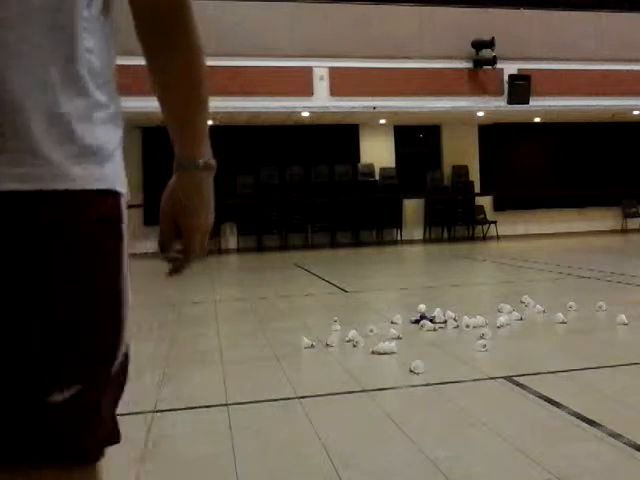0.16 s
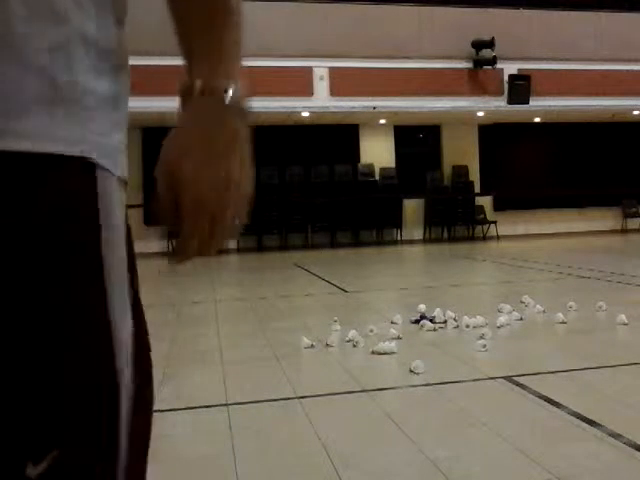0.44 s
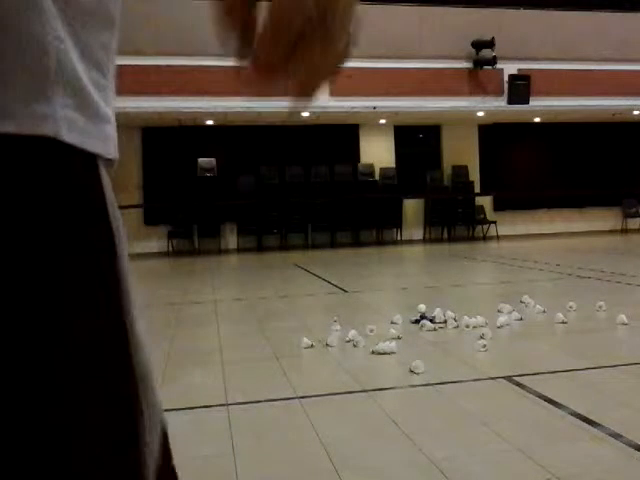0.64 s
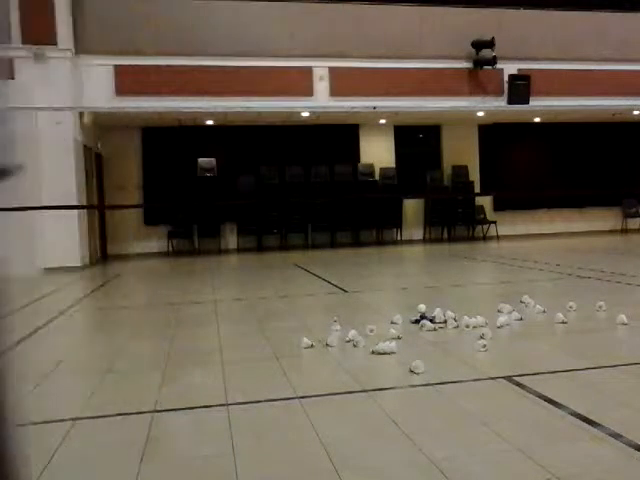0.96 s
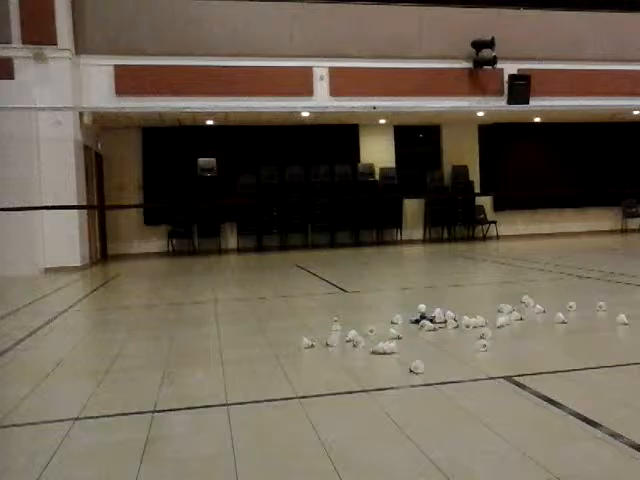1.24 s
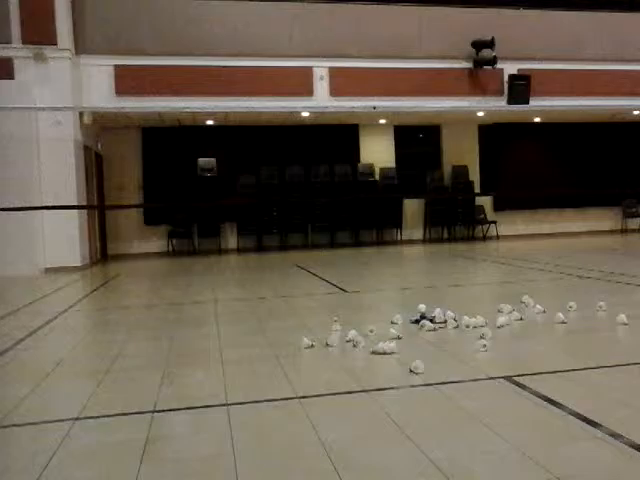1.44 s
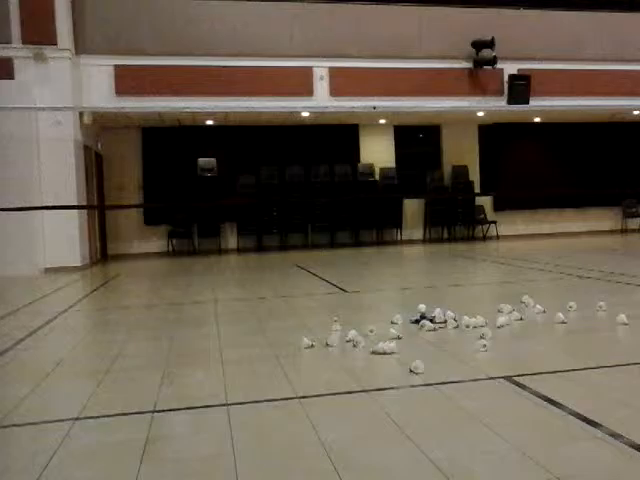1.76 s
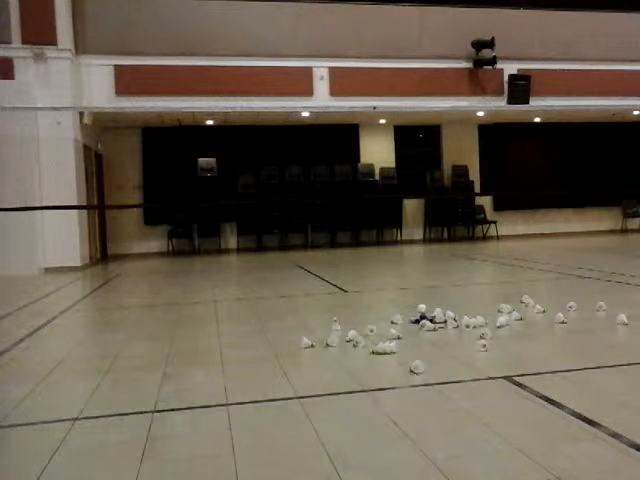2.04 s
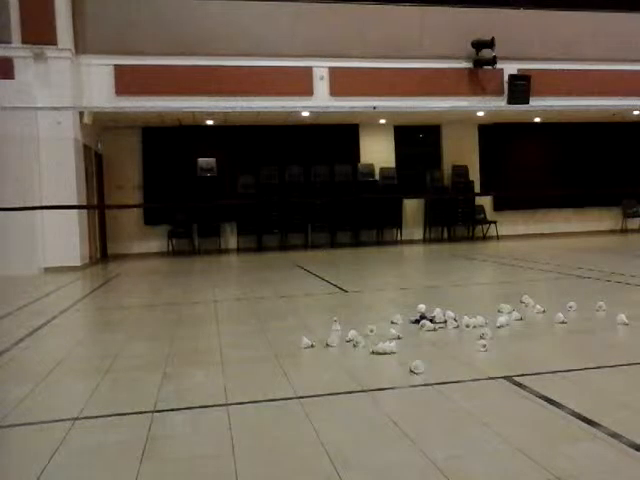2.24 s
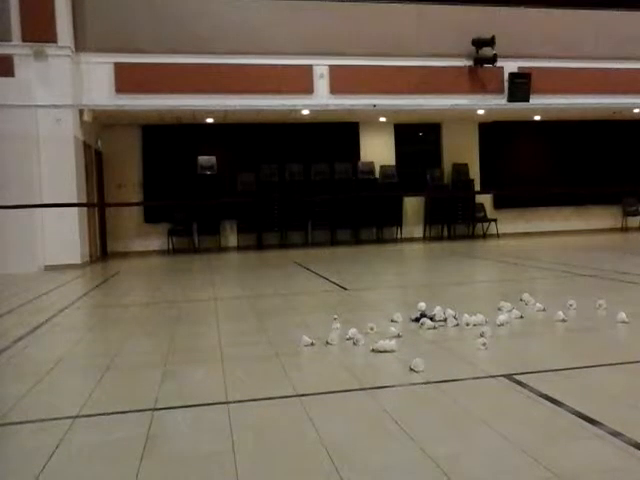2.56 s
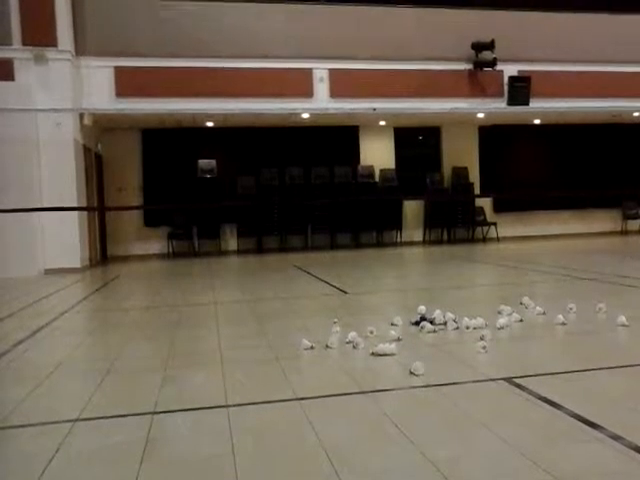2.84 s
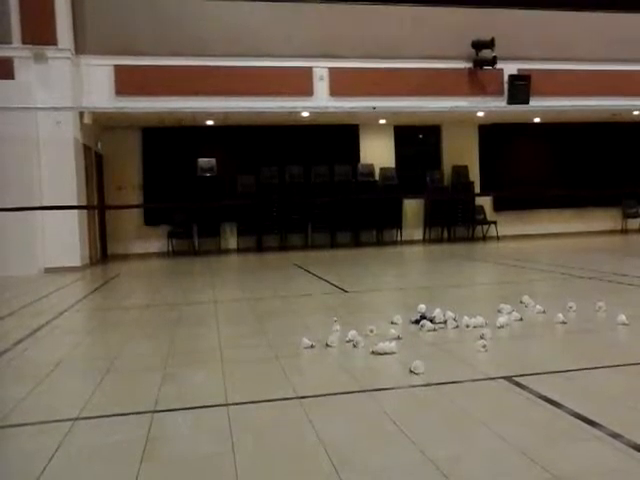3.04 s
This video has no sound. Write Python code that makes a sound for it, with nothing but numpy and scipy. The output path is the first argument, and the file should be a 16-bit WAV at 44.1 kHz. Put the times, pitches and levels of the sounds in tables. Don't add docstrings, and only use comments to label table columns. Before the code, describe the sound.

Rubber soles give short sharp squeaks on a smooth sports hall floor, first a lower one, then a piercing loud one, later smaller ones; knocks, ticks and scuffs between, faint ventilation, small bright microphone.

```python
import sys
import numpy as np
from scipy import signal
from scipy.fft import rfft, irfft, next_fast_len
from scipy.io import wavfile
from scipy.ndimage import uniform_filter1d, minimum_filter1d, map_coordinates

SR = 44100
rng = np.random.default_rng(int(sys.argv[2]) if len(sys.argv) > 2 else 0)


def linear_from_db(decibels):
    return 10 ** (np.asarray(decibels, float) / 20)


def master(y):
    cut = np.clip(np.atleast_2d(y).T, -1, 1)
    pcm = np.round(cut * 32767)
    wavfile.write(sys.argv[1], SR, pcm.astype(np.int16))


N = 141120
T = np.arange(N) / SR

# [t/s, slip rate f/Hz, level/dB, overtone boost/dB]
LOW_SQUEAK = [(1.258, 2620, -44, 13), (1.2605, 2662, -17.5, -2.5), (1.268, 2638, -27, 13),
              (1.276, 2811, -26.5, 4.5), (1.280, 2560, -24.5, 4.5), (1.290, 2613, -15.5, -13.5),
              (1.305, 2750, -15.5, -24), (1.315, 2600, -96, -9)]
HIGH_SQUEAK = [(1.275, 3436, -49, 0.0038), (1.289, 3494, -45.5, 0.0026), (1.321, 3557, -30, 0),
               (1.345, 3608, -33.5, 0), (1.360, 3800, -66, 0.022)]
LOUD_SQUEAK = [(1.5915, 4330, -45, -20), (1.5935, 4230, -16, -22), (1.5955, 4090, -10, -15),
               (1.599, 3940, -8.5, -7), (1.606, 3800, -11, -5), (1.612, 3660, -18, 4),
               (1.618, 3530, -19.5, 9), (1.622, 3110, -27, 10), (1.627, 2750, -55, 8)]
SHORT_SQUEAK = [(2.155, 3170, -58, 0), (2.159, 3050, -37, 3), (2.161, 3150, -23, -5), (2.165, 3100, -22, 3),
                (2.168, 2860, -31, 9), (2.172, 2600, -52, 3)]
LAST_SQUEAK = [(2.958, 2309, -50, 8), (2.961, 2298, -29, 8.5), (2.965, 2173, -17.5, 7),
               (2.975, 2211, -20.5, -3), (2.98, 2092, -25.5, 14), (2.986, 2251, -25, -7.5),
               (2.995, 2223, -23.5, 4), (3.006, 2196, -16, -10), (3.021, 2188, -27, -7)]
FAINT_SQUEAK = [(2.184, 3196, -60, 0), (2.193, 3167, -39.5, 4.5), (2.222, 3150, -59.5, 7),
                (2.234, 3130, -55.5, 3), (2.279, 3186, -43, -2), (2.33, 3160, -67, -5)]
GRIP_BEFORE_LOUD = [(1.5858, 3950, -55, 18), (1.5868, 3900, -28, 18), (1.5885, 3870, -15, 7),
                    (1.5903, 3850, -12.5, 0), (1.5918, 3830, -24, 0), (1.593, 3820, -55, 0)]
GRIP_BEFORE_LAST = [(2.9508, 2600, -45, 0), (2.9518, 2560, -15, 0), (2.955, 2430, -15.5, 0),
                    (2.9575, 2390, -18, 0), (2.960, 2330, -42, 0)]
SQUEAKS = [LOW_SQUEAK, HIGH_SQUEAK, LOUD_SQUEAK, SHORT_SQUEAK,
           LAST_SQUEAK, FAINT_SQUEAK, GRIP_BEFORE_LOUD, GRIP_BEFORE_LAST]
# [level/dB, ..]
OVERTONES = [
    [-14, -7, -17, -27.5, -31.5],
    [-7, -3.5, -33],
    [0, -3.5, -26],
    [2.5, -5, -23, -52],
    [4, -1.5, -3.5, -11, -25, -33],
    [-7.5, 0, -26],
    [0, -2, -23.5],
    [-7, -3, -10, -31, -20],
]
# [delay t/s, level/dB]
WALL_ECHOES = [
    [(.021, -3), (.043, -1)],
    [(.02, 1), (.04, -5.5)],
    [(.0165, -17), (.033, -13), (.040, -11)],
    [(.017, -14), (.032, -12), (.049, -13)],
    [(.011, -15), (.025, -4), (.040, -14)],
    [(.017, -3.5), (.032, -16)],
    [(.0165, -18), (.033, -14), (.040, -14)],
    [(.011, -12), (.025, -5), (.040, -12)],
]
SQUEAK_HALL = [-0.5, -0.5, -13.5, -20.5, -2, -1, -6.5, -2.5]
PITCH_WANDER = [.011, .014, .003, .009, .018, .03, .003, .014]
OVERTONE_FLUTTER = [2.5, 3, .7, 1, 4, 6, .5, 1.5]
OVERTONE_BLUR = [.25, .5, 1.1, .6, .15, .5, .3, .15]
GRIT_LEVEL = [-24.5, -19.5, -40, -17, -20, 0, -19, -20.5]
# [f/Hz, level/dB per Hz]
GRIT_COLOUR = [(1500, -43), (2800, 4), (4200, 6), (6500, 10), (9000, -23), (14000, -21)]
# [t/s, peak level/dB, pitch f/Hz, puff level/dB]
HEELS = [(0.2906, -43.5, 705, -6.5), (.353, -31.5, 493, -18.5), (.357, -36, 450, -25),
         (1.0032, -40.5, 696, -5.5), (1.0631, -31.5, 546, -11.5), (1.586, -30.5, 526, -37),
         (1.6444, -19, 444, -14), (1.70, -42.5, 600, -0.5), (2.1435, -25, 1036, -7.5),
         (2.177, -32, 620, -13.5), (2.245, -34.5, 440, -14), (2.275, -28.5, 390, -28)]
# [f/Hz, level/dB per Hz]
PUFF_COLOUR = [(150, -9), (400, -10), (1500, 0), (2500, -22), (6000, -18), (10000, -48)]
# [t/s, f/Hz, level/dB, t60/s]
LOOSE_FITTING = (2.245, 1151.5, -51, 1.66)
# [t/s, peak level/dB, lowest f/Hz,
# highest f/Hz]
SNAPS = [(0.316, -43.5, 4000, 9000), (0.38, -33, 3500, 13000), (.387, -25.5, 2440, 10400),
         (.396, -33, 4000, 13000), (0.4086, -31, 3480, 10800), (.418, -39.5, 4000, 5960),
         (.422, -47, 4000, 6000), (0.429, -43, 6500, 8000), (.437, -44, 4500, 9000),
         (.965, -43, 6800, 9000), (.969, -49, 6800, 10000), (1.022, -47, 6000, 9000),
         (1.087, -40.5, 3500, 12000), (1.096, -45, 4000, 9000), (1.118, -38, 3500, 12000),
         (1.172, -34, 3000, 13000), (1.7705, -21, 1000, 6600), (2.2427, -27, 2910, 13000),
         (1.2695, -31, 6000, 14000), (1.585, -30, 300, 14000), (2.9503, -24, 3000, 14000),
         (2.522, -28, 6130, 8600), (2.525, -32, 6050, 8500), (2.5445, -27, 5850, 9100),
         (2.599, -30, 4300, 8070), (2.639, -26, 6000, 7800), (2.644, -35, 1500, 5500),
         (2.768, -33.5, 6540, 8800)]
# [start t/s, length t/s, level/dB, broad rasp level/dB]
DRAGS = [(0.29, 0.25, -67.5, 5), (0.59, 0.033, -61.5, -9), (1.241, 0.013, -48, -23),
         (2.145, 0.013, -41.5, -1), (2.162, 0.022, -44.5, 0), (2.246, 0.095, -45.5, 1.5),
         (2.392, 0.039, -42, -15), (2.464, 0.042, -47, -3), (2.493, 0.077, -35.5, -9.5),
         (2.566, 0.042, -41.5, -6.5), (2.613, 0.026, -46.5, -2.5), (2.63, 0.036, -38.5, -8.5),
         (2.665, 0.028, -51.5, -1), (2.724, 0.038, -44.5, -8.5), (2.799, 0.036, -52, 0.5),
         (2.829, 0.12, -45.5, -7)]
# [f/Hz, level/dB per Hz]
WHISPER_COLOUR = [(3500, -32), (5500, -30), (6500, 0.5), (7500, 3), (8600, -6.5), (10000, -44.5)]
# [f/Hz, level/dB per Hz]
RASP_COLOUR = [(500, -22), (1500, -0.5), (4000, 0.5), (9000, 0.5), (13000, -3)]
# [start t/s, length t/s, centre f/Hz, width f/Hz]
THIN_SLIDE = (2.79, .165, 12600, 1300)
# [f/Hz, t60/s]
HALL_T60 = [(300, 0.93), (1000, 0.7), (2640, 0.97), (7000, 0.78), (12000, 0.78)]
# [t/s, level/dB]
VENTILATION = [(0.0, -52), (0.34, -51), (0.53, -50.5), (1.29, -51.5), (1.67, -44.5), (2.059, -47.5),
               (2.43, -44), (2.9, -48), (3.2, -44)]
# [f/Hz, level/dB per Hz]
RUMBLE_COLOUR = [(25, -18), (60, -11), (100, 1.5), (200, -1.5), (500, -9.5), (1500, -18), (4000, -35.5),
                 (9000, -83)]
# [f/Hz, level/dB per Hz]
HISS_COLOUR = [(300, -24), (1500, 3), (4000, 3.5), (6200, -3.5), (7200, 3.5), (8300, -0.5), (14000, -1)]


def squeak(slip, tones_db, walls, hall_db, wander, flutter_db, blur, grit_db):
    s, hz, db, boost_db = np.transpose(slip)
    phase = 2 * np.pi * np.cumsum(np.interp(T, s, hz) * (1 + wander * wobble(300))) / SR
    boost = np.interp(T, s, boost_db)
    stack = np.zeros(N)
    for k, tone_db in enumerate(tones_db):
        level_db = tone_db + min(k, 1) * boost + flutter_db * wobble(300)
        phase_noise = blur * k * (k - 1) / 2 * wobble(900)
        stack += linear_from_db(level_db) * np.sin((k + 1) * phase + k + phase_noise)
    grit = linear_from_db(grit_db) * noise(GRIT_COLOUR) * (1 + np.cos(phase))
    direct = linear_from_db(np.interp(T, s, db, -200, -200)) * (np.sqrt(2) * stack + grit)
    return direct + wall_echoes(direct, walls) + linear_from_db(hall_db) * hall(direct)


def wall_echoes(x, walls):
    smear_s, clean_share = .003, .6
    echoes, t = np.zeros(SR // 10), T[:SR // 50]
    for delay_s, db in walls:
        rough = rng.standard_normal(len(t)) * np.exp(-t / smear_s)
        rough[0] = clean_share * np.linalg.norm(rough)
        echoes[round(delay_s * SR):][:len(t)] += linear_from_db(db) * rough / np.linalg.norm(rough)
    return signal.fftconvolve(x, echoes)[:N]


def knocks():
    thud_t60, puff_t60, attack_s, hall_db = .012, .02, .00017, -15
    x, t, puff = np.zeros(N + SR), T[:SR // 2], noise(PUFF_COLOUR)
    for s, db, hz, puff_db in HEELS:
        i = round(s * SR)
        thud = linear_from_db(-60 * t / thud_t60) * np.sin(2 * np.pi * hz * t)
        thud += linear_from_db(puff_db - 60 * t / puff_t60) * puff[i // 2:][:len(t)]
        x[i:][:len(t)] += linear_from_db(db + 5) * thud * (1 - np.exp(-t / attack_s))
    x = filtered(x[:N], lambda f: (1j * f / (200 + 1j * f)) ** 2)
    s, hz, db, t60 = LOOSE_FITTING
    since = np.clip(T - s, 0, None)
    ring = linear_from_db(db - 60 * since / t60 + 1.3 * wobble(36)) * np.sin(2 * np.pi * hz * since)
    ring *= 1 - np.exp(-since / .012)
    return x + linear_from_db(hall_db) * hall(x) + ring


def ticks():
    t60 = .0054
    x, t = np.zeros(N + SR), T[:SR // 50]
    for s, db, low_hz, high_hz in SNAPS:
        burst = linear_from_db(-60 * t / t60) * (rng.standard_normal(len(t)) + 3 * (t == 0))
        band = signal.butter(2, [low_hz, high_hz], "bandpass", fs=SR, output="sos")
        snap = signal.sosfilt(band, burst)
        x[round(s * SR):][:len(t)] += linear_from_db(db - .5) * snap / np.abs(snap).max()
    return x[:N]


def swell(start_s, length_s, power):
    return np.sin(np.pi * np.clip((T - start_s) / length_s, 0, 1)) ** power


def scuffs():
    hall_db, slide_db = -18.5, -52
    swells = np.array([swell(s, length, .51) for s, length, _, _ in DRAGS])
    _, _, db, rasp_db = np.transpose(DRAGS)
    grain = unit(linear_from_db(1.5 * wobble(550) + wobble(90)))
    whisper = linear_from_db(db) @ swells * noise(WHISPER_COLOUR)
    rasp = linear_from_db(db + rasp_db) @ swells * noise(RASP_COLOUR)
    x = grain * (whisper + rasp)
    s, length, hz, width = THIN_SLIDE
    thin = unit(filtered(rng.standard_normal(N), lambda f: np.exp(-((f - hz) / width) ** 2)))
    return x + linear_from_db(hall_db) * hall(x) + linear_from_db(slide_db) * swell(s, length, .5) * thin


def hall(x):
    start_s, rise_s = .0013, .04
    hz, t, z = signal.stft(rng.standard_normal(3 * SR // 2), SR, nperseg=256)
    grow = 1 - np.exp(-np.clip(t - start_s, 0, None) / rise_s)
    decay = linear_from_db(-60 * t / along(HALL_T60, hz)[:, None])
    tail = signal.istft(z * grow * decay, SR, nperseg=256)[1]
    return signal.fftconvolve(x, tail / np.linalg.norm(tail))[:N]


def air():
    s, db = np.transpose(VENTILATION)
    draught_db = np.interp(T, s, db)
    rumble = linear_from_db(-.5 + draught_db + .76 * wobble(7)) * noise(RUMBLE_COLOUR)
    hum = linear_from_db(-57.5 + 4 * wobble(5)) * np.sin(2 * np.pi * 101.5 * T + .8 * wobble(8))
    hiss_db = -57.5 + .99 * (draught_db - db.mean()) + .4 * wobble(2.1)
    return rumble + hum + linear_from_db(hiss_db) * noise(HISS_COLOUR)


def unit(x):
    return x / np.sqrt(np.mean(x ** 2) + 1e-20)


def along(points, hz):
    f, v = np.transpose(points)
    return np.interp(np.log(hz + 1), np.log(f + 1), v)


def wobble(rate):
    return map_coordinates(rng.standard_normal(int(N * rate / SR) + 4), [T * rate])


def filtered(x, response):
    m = next_fast_len(N + SR // 2)
    return irfft(rfft(x, m) * response(np.fft.rfftfreq(m, 1 / SR)), m)[..., :N]


def noise(colour):
    return unit(filtered(rng.standard_normal(N), lambda hz: linear_from_db(along(colour, hz))))


def scene():
    each_squeak = zip(SQUEAKS, OVERTONES, WALL_ECHOES, SQUEAK_HALL,
                      PITCH_WANDER, OVERTONE_FLUTTER, OVERTONE_BLUR, GRIT_LEVEL)
    soles = sum(squeak(*each) for each in each_squeak)
    return (soles + knocks() + ticks() + scuffs() + air())[None]


def top_cut(x):
    return signal.sosfilt(signal.butter(12, 14660, fs=SR, output="sos"), x)


def record(dry):
    port_hz, width_hz, port_db, top_hz, ceiling = 6640, 1990, 3.5, 13950, .9

    def microphone(f):
        port = 1j * f * width_hz / (port_hz ** 2 - f * f + 1j * f * width_hz)
        return (1 + linear_from_db(port_db) * port) / np.sqrt(1 + (f / top_hz) ** 240)

    x = filtered(dry, microphone)
    need = ceiling / np.maximum(np.abs(x), ceiling)
    gain = uniform_filter1d(minimum_filter1d(need, size=301), size=151)
    return top_cut(x * gain)


dry = scene()
out = record(dry)
master(out)
```